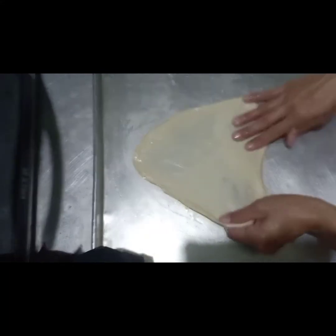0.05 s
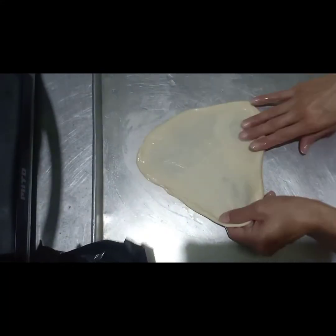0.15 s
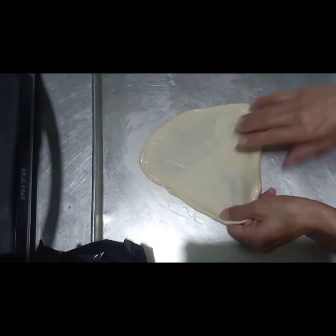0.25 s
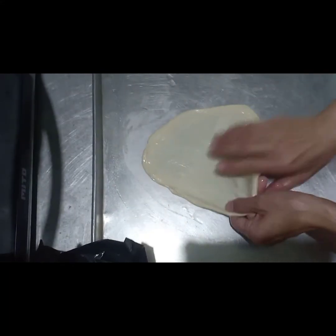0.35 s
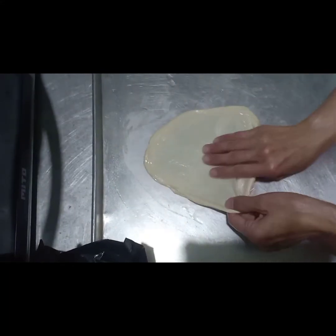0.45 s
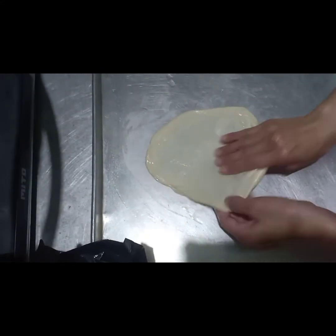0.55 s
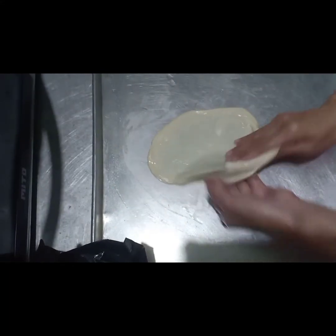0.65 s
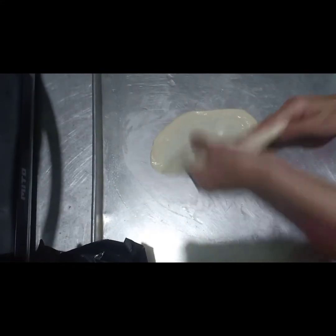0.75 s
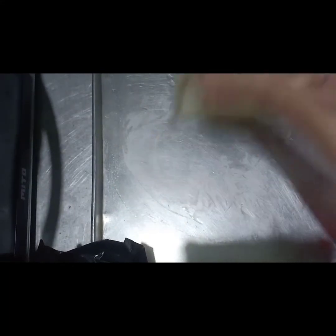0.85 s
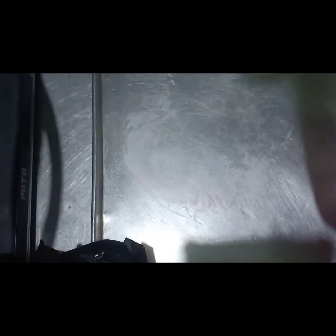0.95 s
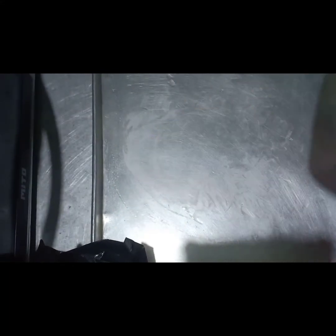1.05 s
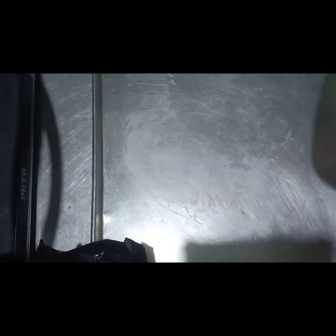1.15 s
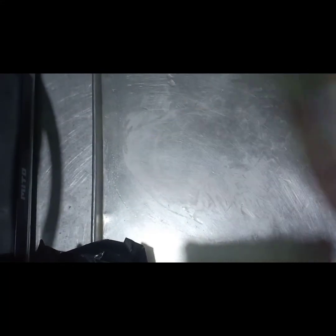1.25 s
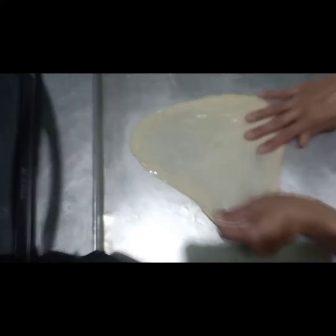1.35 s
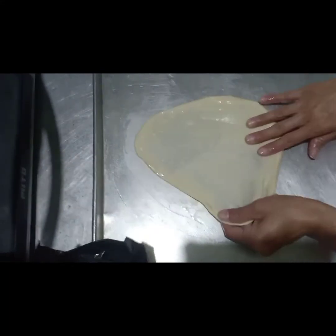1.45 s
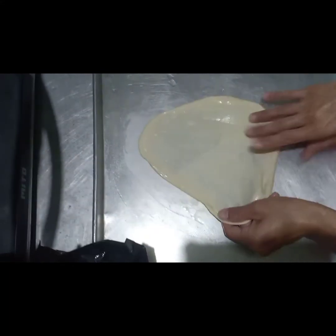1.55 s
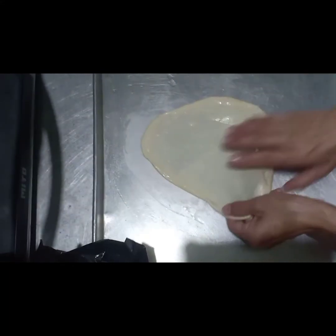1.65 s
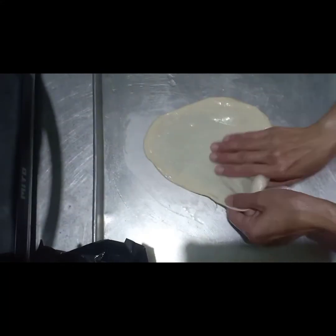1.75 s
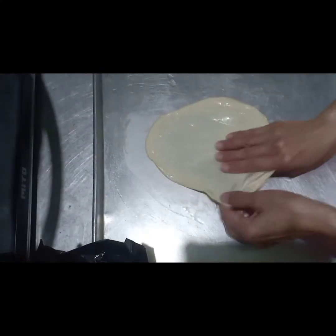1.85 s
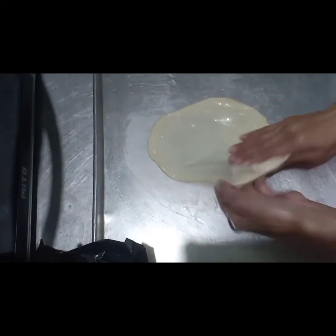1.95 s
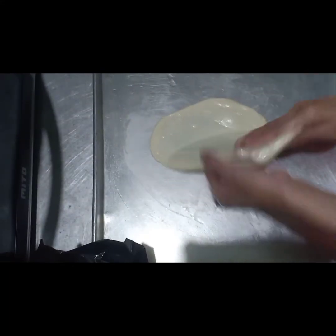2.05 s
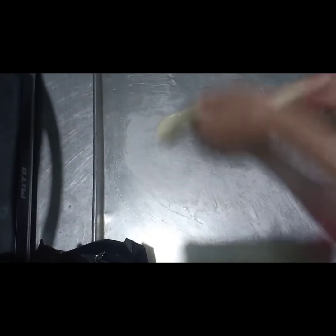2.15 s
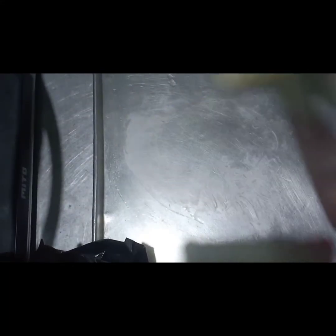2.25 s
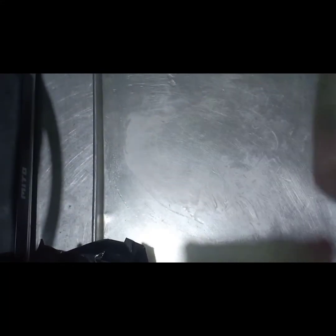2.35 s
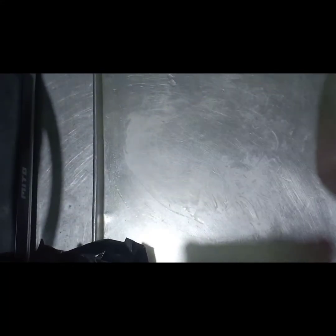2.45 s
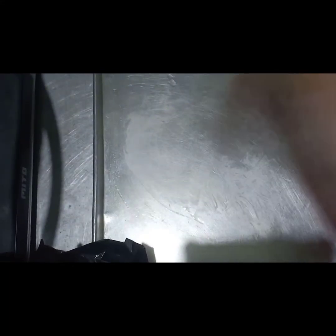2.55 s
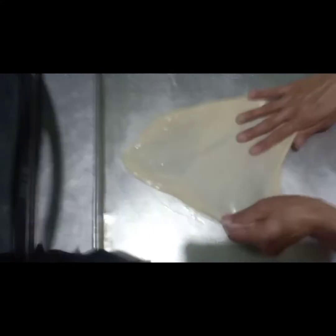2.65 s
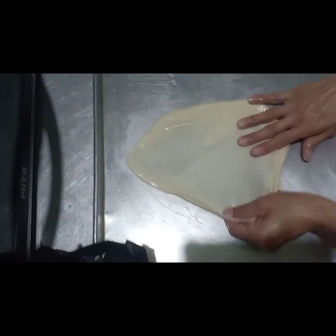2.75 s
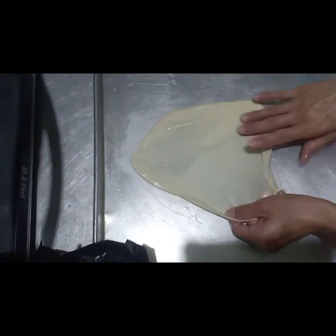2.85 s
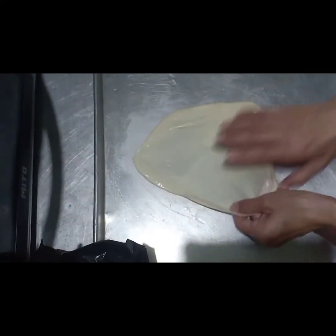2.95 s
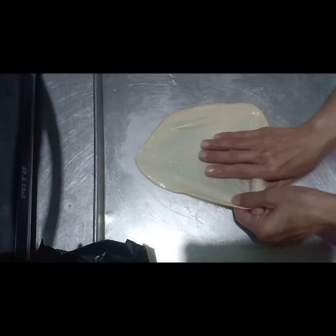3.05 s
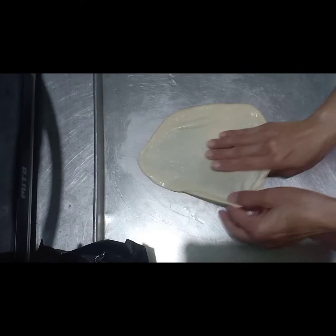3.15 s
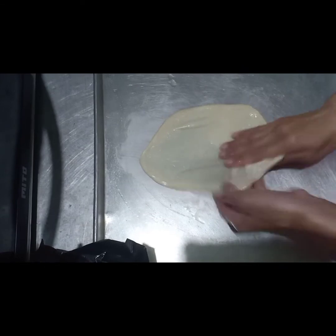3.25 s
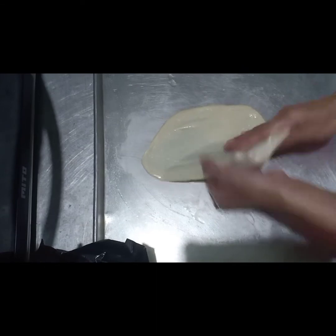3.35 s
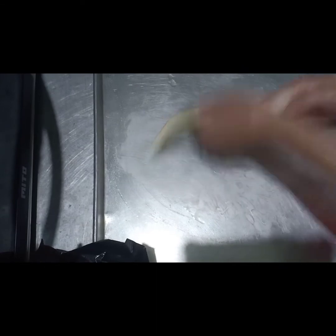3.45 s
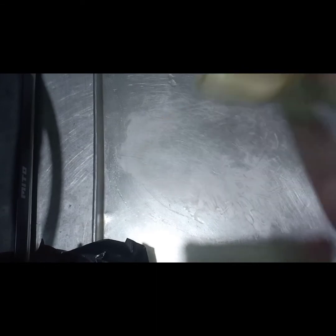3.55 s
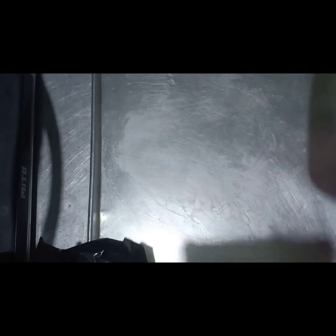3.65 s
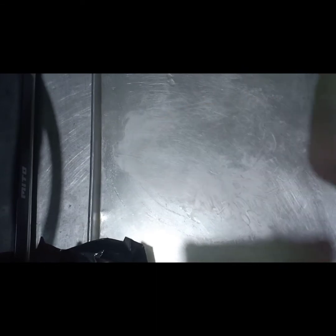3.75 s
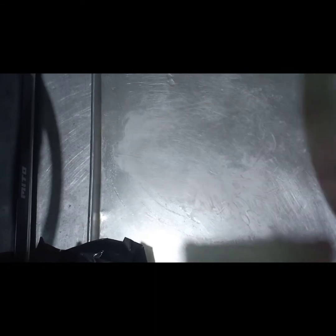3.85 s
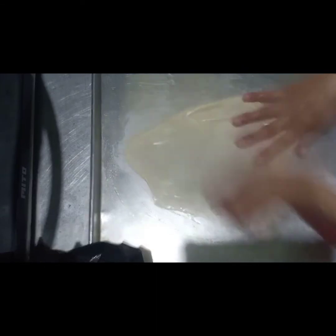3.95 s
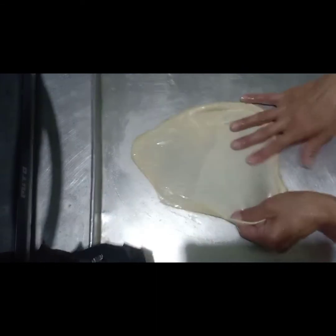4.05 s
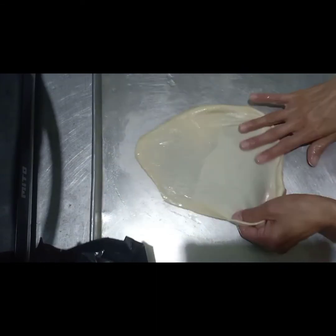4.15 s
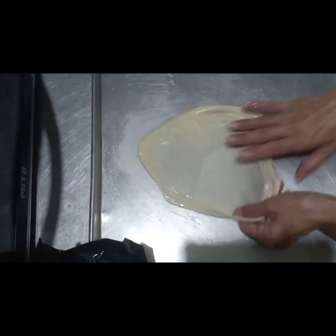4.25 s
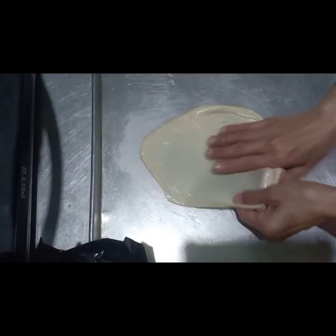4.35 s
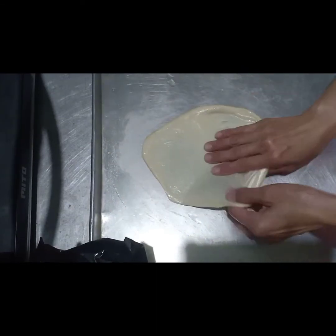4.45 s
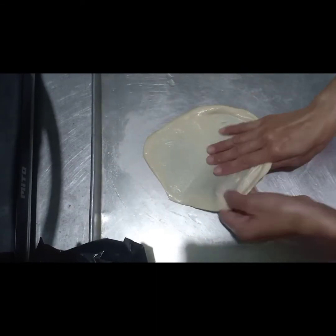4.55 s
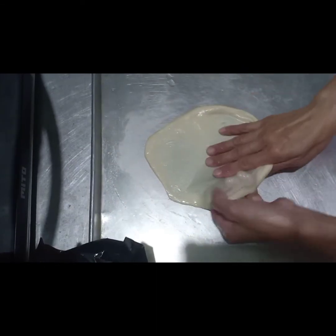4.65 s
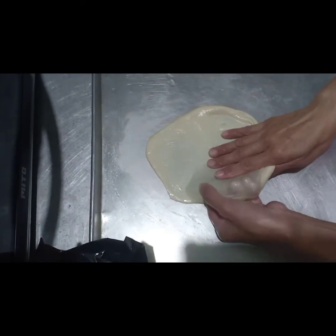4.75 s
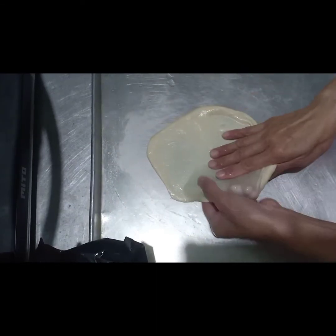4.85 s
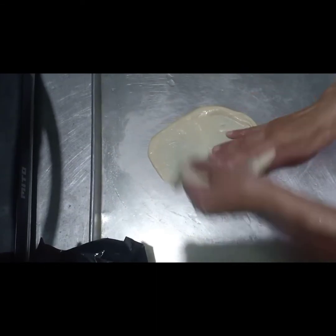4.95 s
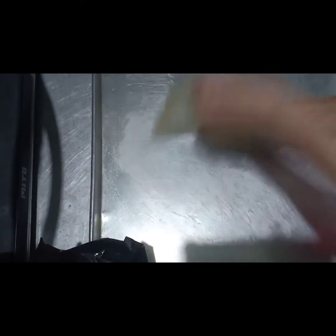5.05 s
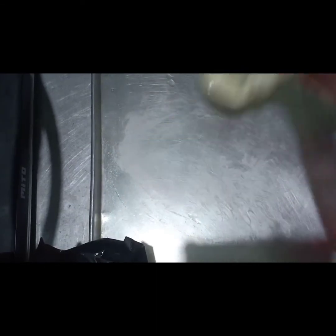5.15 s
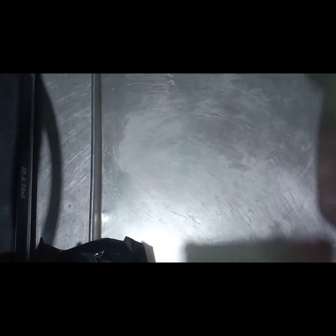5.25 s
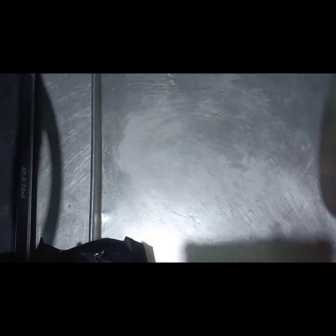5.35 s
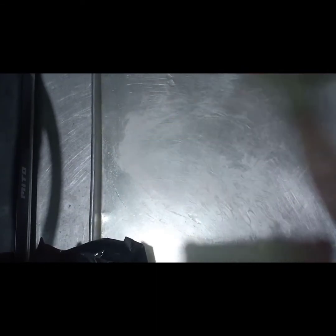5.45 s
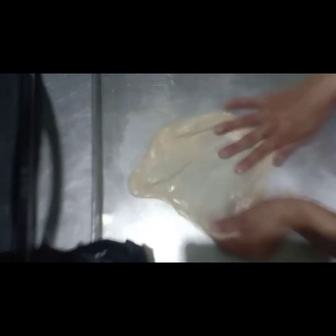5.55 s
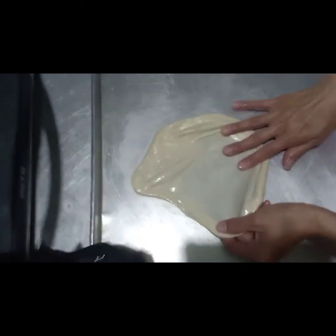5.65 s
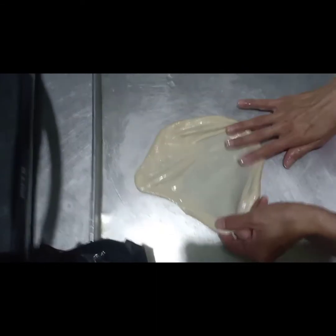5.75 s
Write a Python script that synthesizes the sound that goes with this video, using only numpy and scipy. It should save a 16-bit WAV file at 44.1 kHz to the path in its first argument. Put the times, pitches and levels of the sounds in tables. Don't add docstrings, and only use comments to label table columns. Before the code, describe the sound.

In a hard-walled kitchen with a low fan rumble and soft air hiss, a sheet of oiled dough is swung onto a steel table, heard close in stereo. The first slap lands at 0.12 seconds: several wet contacts within a few hundredths of a second, a sharp splashy crack with a thud, brief damped table ring and short echo. Faint finger pats with hollow pops follow at 0.5 to 0.65, then tiny distant clinks around 0.9 to 1.4. The second slap hits at 1.44, fuller; quiet pats come at 1.8 to 2.25. The third, at 2.75, is drier, with a soft flop as it settles until 2.9. Light pats follow at 3.2 to 3.5. A far cupboard door knocks at 3.8, and a utensil clinks at 3.94. The fourth slap strikes at 4.08, wet and splashy, with pats at 4.4 to 4.6 and a faint clink at 4.9. The last smack cracks at 5.7, its echo cut short by the ending.

```python
import sys
import numpy as np
from scipy import signal
from scipy.fft import rfft, irfft
from scipy.io import wavfile

SR = 44100
rng = np.random.default_rng(int(sys.argv[2]) if len(sys.argv) > 2 else 0)


def rack_gain(trim_db):
    fader = np.asarray(trim_db, float)
    return 10 ** (fader / 20)


def dump(signal):
    limited = np.clip(np.atleast_2d(signal).T, -1, 1)
    pcm = np.round(limited * 32767).astype(np.int16)
    wavfile.write(sys.argv[1], SR, pcm)


N = 255338


# mode in Hz, level in dB, T60 in seconds.
TABLE_MODES = [(123, -11, 0.54), (272, -19, 0.044), (553, -25, 0.086), (960, 2, 0.064)]


def dough():
    touch = rack_gain(-4.0) * contacts(landings(), lag_per_db=2.0)
    return touch + rack_gain(-41.5) * struck(TABLE_MODES, touch.mean(axis=0))


# start in seconds, peak in dB, thump in dB, splash in dB, left-right in dB.
EDGE_HITS = [
    (0.1201, -18, -6.5, -17, 0.5),
    (1.4388, -10, -2.5, -12, 1.5),
    (2.748, -15.5, -22, -29.5, 2.5),
    (4.083, -13, -6.5, -11, -3),
    (5.701, -7, -7.5, -18.5, -4.5),
]
# start in seconds, peak in dB, splash in dB, left-right in dB.
BELLY_HITS = [(0.133, -2.5, -9.5, 3), (0.139, 0, -11, 0), (0.16, -13, -6, 4.5), (0.179, -12, -5, -6.5),
              (0.237, -15, -15, 4), (1.4434, 0.5, -28.5, 2.5), (1.452, -0.5, -10, 0.5),
              (1.463, -13.5, -9, 3.5), (1.474, -10, -13.5, -8.5), (2.758, 2, -15.5, 2.5),
              (2.767, -7, -24, -6), (2.773, -10, -27, -2), (2.79, -5, -26, -4.5), (4.088, -3, -18, -5.5),
              (4.0955, -0.5, -10, 5), (4.101, -9.5, -25.5, 5.5), (4.112, -11, -22, -1),
              (5.7107, 3, -15, -3), (5.725, -7, -22, -4), (5.738, -16, -20, -6)]
# start in seconds, peak in dB.
SETTLING = [
    (0.19, -27),
    (0.27, -33.5),
    (2.80, -18.5),
    (2.835, -19),
    (2.9, -27.5),
]
SLAP_BODY_DB = [-0.5, 1, 2.5, 1.5, -2]


def landings():
    edge = [(s, peak_db, thump_db, splash_db, 5.07, pan_db)
            for s, peak_db, thump_db, splash_db, pan_db in EDGE_HITS]
    edge_s = [row[0] for row in EDGE_HITS]
    belly = []
    for s, peak_db, splash_db, pan_db in BELLY_HITS:
        slap = np.searchsorted(edge_s, s) - 1
        contact_ms = 3.49 - 0.06 * (peak_db + 6)
        belly.append((s, peak_db, -14 + SLAP_BODY_DB[slap], splash_db, contact_ms, pan_db))
    settling = [(s, peak_db, -11, -19.5, 32, 0) for s, peak_db in SETTLING]
    return edge + belly + settling


# frequency in Hz, density in dB per Hz.
SMACK = [(35, -40), (70, -12), (411, -7.5), (756, -4), (978, -3.5), (1420, -7.5), (2280, -0.5), (3500, -9),
         (4300, -10.5), (5250, -5.5), (7000, -16.5), (8700, -29.5), (15000, -40), (16400, -44)]


def contacts(rows, lag_per_db):
    length = 3000
    out = np.zeros((2, N + 3100))
    t_ms = 1000 * np.arange(length) / SR
    cuts = ((700, "low"), ((700, 3600), "band"), ((3600, 7500), "band"), (7500, "high"))
    split = [signal.butter(2, *cut, fs=SR, output="sos") for cut in cuts]
    for s, peak_db, thump_db, splash_db, ms, pan_db in rows:
        spikes = rng.exponential(1, length) ** 0.47
        shared, left, right = rng.standard_normal((3, length)) * spikes
        shared[0] = -rack_gain(9.5) * (ms < 10)
        burst = (shared + 0.67 * np.array([left, right])) * np.exp(-t_ms / max(ms, 0.3))
        parts = [signal.sosfilt(sos, burst) for sos in split]
        low, middle, high, air = (part / np.abs(part).max() for part in parts)
        touch = rack_gain(thump_db + 2) * low.mean(axis=0) + middle
        touch = touch + rack_gain(splash_db + 12) * high + rack_gain(splash_db * 1.16 + 23) * air
        touch = rack_gain(peak_db) * touch
        lag = int(np.clip(round(pan_db * lag_per_db), -20, 20))
        for side, sign in enumerate((1, -1)):
            at = round(s * SR) + max(-sign * lag, 0)
            out[side, at:at + length] += touch[side] * rack_gain(sign * pan_db / 2)
    return colour(out[:, :N], SMACK)


def pats():
    length = 4000
    pops = np.zeros(N + length)
    for s, peak_db, _, hollow_hz in PATS:
        puff = rng.standard_normal(length) * np.exp(-np.arange(length) / (SR * 0.006))
        pop = ring(puff, hollow_hz, 58.0 / hollow_hz)
        at = round(s * SR)
        pops[at:at + length] += rack_gain(peak_db) * pop / np.abs(pop).max()
    return rack_gain(-9.5) * contacts(fingers(), lag_per_db=0) + pops[:N] * np.array([[rack_gain(0.7)], [rack_gain(-0.7)]])


# start in seconds, peak in dB, thump in dB, hollow under the hand in Hz.
PATS = [(0.494, -45, -5, 943), (0.56, -48.5, -11, 960), (0.652, -39.5, -5.5, 960), (1.778, -48, 1.5, 2220),
        (1.889, -48.5, -14, 947), (1.988, -38, -7, 970), (2.243, -47.5, -24, 2270),
        (3.21, -51.5, -20, 2690), (3.299, -44, -7.5, 960), (3.480, -46.5, -23, 933),
        (3.522, -48.5, -26, 2320), (4.389, -48.5, -9, 730), (4.459, -49, -2, 763),
        (4.481, -39.5, -35, 2770), (4.57, -49, -14, 750), (4.618, -35.5, -10.5, 990)]


def fingers():
    return [(s, peak_db + 12, thump_db, -21, 2.36, 0) for s, peak_db, thump_db, _ in PATS]


# mode in Hz, level in dB, T60 in seconds.
CUPBOARD_MODES = [(150.5, -6, 0.28), (290, -6, 0.32), (471, -7.5, 0.17), (512, -6.5, 0.33),
                  (654, -11, 0.31), (807, -3.5, 0.098)]
# start in seconds, peak in dB.
CUPBOARD_HITS = [(3.811, -34.5), (3.826, -33.5), (3.85, -36.5), (3.89, -43)]
# mode in Hz, level in dB, T60 in seconds.
UTENSIL_MODES = [(2270, -4, .05), (2510, -4, 0.14), (3086, 3.5, 0.14), (4000, 2, 0.041),
                 (5160, -5.5, 0.098), (5800, -17, 0.054)]
# start in seconds, peak in dB.
UTENSIL_HITS = [(3.938, -43), (3.944, -49.5), (3.958, -51), (3.975, -51)]


def clatter():
    rings = struck(CUPBOARD_MODES, clicks(CUPBOARD_HITS)) + struck(UTENSIL_MODES, clicks(UTENSIL_HITS))
    flutter = np.array([drift(58), drift(58)])
    return rack_gain(-13.5) * contacts(far_work(), lag_per_db=1.0) + rings * (0.64 + 0.5 * flutter)


# start in seconds, peak in dB, splash in dB, left-right in dB.
CLINKS = [(0.003, -62, 16.5, -7), (0.029, -57, 13, -8), (0.868, -50.5, 1, -5), (1.113, -48.5, -10, 0),
          (1.15, -64, 13, -3), (1.18, -60, 8, -4), (1.30, -57.5, 5, -5), (1.328, -53.5, 12, 6),
          (1.365, -62, 10, -3), (2.08, -62, 2, 0), (2.30, -63, 0, 5), (2.53, -61, -1, -4),
          (3.940, -54.5, -3, -10), (3.975, -60.5, -3, -3), (4.903, -56.5, 4, 7)]
# start in seconds, peak in dB, thump in dB, contact in ms.
KNOCKS = [
    (3.792, -52.5, 2, 9.8),
    (3.811, -46.5, -3.5, 12),
    (3.825, -58.5, 15, 10),
    (3.85, -67.5, 16, 22),
]


def far_work():
    gain_db = 13
    clinks = [(s, peak_db + gain_db, -30.5, splash_db, 7.4, pan_db) for s, peak_db, splash_db, pan_db in CLINKS]
    knocks = [(s, peak_db + gain_db, thump_db, -14, ms, -2) for s, peak_db, thump_db, ms in KNOCKS]
    return clinks + knocks


# frequency in Hz, T60 in seconds.
KITCHEN_T60_S = [(60, 0.25), (250, 0.5), (800, 0.45), (2500, .44), (5500, 0.4), (15000, 0.38)]
# frequency in Hz, gain in dB.
WALLS_TOP = [(6000, 0.5), (9000, -3.5), (15000, 5)]


def kitchen(rows, wet_db, bands):
    s, peak_db, thump_db, splash_db, ms, _ = np.transpose(rows)
    step = 16
    rate = SR / step
    span = np.arange(500)
    at = (np.round(s * rate).astype(int)[:, None] + span).ravel()
    spent = np.exp(-2000 * span / rate / np.maximum(ms, 0.3)[:, None]) * 2000 / rate
    build = np.exp(-1 / (rate * 0.001))
    near_t60_s, near_db = 0.1, 7.5
    out = 0
    for hz, band in bands:
        bass = at_hz([(600, 1), (1600, 0)], hz)
        treble = at_hz([(2800, 0), (5000, 1), (10000, 0.8)], hz)
        weight_db = bass * (thump_db + 11.5) + treble * (splash_db + 9.5) + at_hz(WALLS_TOP, hz)
        poured = rack_gain(2 * (peak_db + weight_db + wet_db))[:, None] * spent
        energy = np.bincount(at, poured.ravel(), N // step + 1) + 1e-18
        energy = signal.lfilter([1 - build], [1, -build], energy)
        whole = signal.lfilter([1], [1, -rack_gain(-120 / (rate * at_hz(KITCHEN_T60_S, hz)))], energy)
        near = signal.lfilter([1], [1, -rack_gain(-120 / (rate * near_t60_s))], energy)
        level = np.sqrt(whole + rack_gain(2 * near_db) * near)
        patchy = rack_gain(1.57 * drift(25))
        out = out + band * patchy * np.interp(np.arange(N) / step, np.arange(len(level)), level)
    return colour(out, SMACK)


# frequency in Hz, density in dB per Hz.
FAN = [(15, -54.5), (25, -32), (48, -17), (58, -14.5), (80, -4.5), (253, -12.5), (444, -9.5), (565, -12),
       (682, -12), (782, -15), (897, -15), (994, -15), (1500, -15.5), (1950, -51), (3300, -120)]
# frequency in Hz, density in dB per Hz.
HISS = [(530, -49), (900, 0.5), (992, -11.5), (1070, -10), (1280, -6.5), (1550, -5.5), (1960, -3),
        (2180, 1.5), (3950, -7.5), (5420, -2), (6990, -15.5), (9810, -23.5), (15000, -22.5), (15700, -20),
        (16300, -44.5)]
# frequency in Hz, width in Hz, level in dB.
HUM = [(80.4, 9.3, -62.5), (124, 8.7, -65.5), (222.5, 5.53, -71)]
# time in seconds, level in dB.
DRAUGHT = [(0.0, -49), (0.6, -52.5), (1.3, -52.5), (2.7, -52.5), (3.15, -55.5), (5.79, -55.5)]


def background(bands):
    t = np.arange(N) / SR
    flow_db = np.interp(t, *np.transpose(DRAUGHT))
    linger_s = 0.24
    linger = sum((t > s) * np.exp(-np.maximum(t - s, 0) / linger_s) for s, *_ in EDGE_HITS)
    fan_change_db = 0.598 * (flow_db - flow_db.mean()) + 10.5 * linger
    hiss_db = flow_db + 10 * linger
    fan, hiss, together = 0, 0, drift(1.344)
    for hz, forward in bands:
        band = forward[:, ::-1]
        wander = rack_gain(together + 0.21 * drift(15.0))
        if hz < 1200:
            fan = fan + band * wander
        else:
            hiss = hiss + band * wander
    tones = 0
    for hz, width_hz, level_db in HUM:
        tones = tones + rack_gain(level_db) * rms_one(ring(rng.standard_normal(N), hz, 3.2 / width_hz))
    rumble = rack_gain(fan_change_db - 57.5) * rms_one(colour(fan, FAN))
    return rumble + rack_gain(hiss_db) * rms_one(colour(hiss, HISS)) + tones * rack_gain(fan_change_db - 2.0)


# frequency in Hz, correlation from -1 to 1.
LIKENESS = [(60, 0.96), (150, 0.91), (380, 0.69), (950, 0.09), (2380, 0.01), (5980, -0.01), (15000, -0.01)]


def diffuse(count):
    edges_hz = 25 * 2 ** np.arange(0, 9.5, 1 / 3)
    white = rng.standard_normal((2, 2, count))
    for k, (low, high) in enumerate(zip(edges_hz, edges_hz[1:])):
        sos = signal.butter(2, [low, high], "band", fs=SR, output="sos")
        mid, side = signal.sosfilt(sos, white[k % 2])
        hz = np.sqrt(low * high)
        alike = np.clip(at_hz(LIKENESS, hz), -1, 1)
        yield hz, np.sqrt(1 + alike) * mid + np.sqrt(1 - alike) * side * [[1], [-1]]


def struck(modes, force):
    return sum(rack_gain(level_db) * ring(force, hz, t60_s) for hz, level_db, t60_s in modes)


def ring(x, hz, t60_s):
    r, w = rack_gain(-60 / (t60_s * SR)), 2 * np.pi * hz / SR
    return signal.lfilter([0, np.sin(w)], [1, -2 * r * np.cos(w), r * r], x + 1e-18)


def clicks(hits):
    return sum(rack_gain(peak_db) * (np.arange(N) == round(s * SR)) for s, peak_db in hits)


def drift(rate_hz):
    knots = rng.standard_normal(int(rate_hz * N / SR) + 2)
    return 1.22 * np.interp(np.arange(N) * rate_hz / SR, np.arange(len(knots)), knots)


def colour(x, spectrum):
    hz = np.maximum(np.fft.rfftfreq(8192, 1 / SR), 1)
    cepstrum = irfft(np.log(rack_gain(at_hz(spectrum, hz))))
    cepstrum[1:4096] *= 2
    response = irfft(np.exp(rfft(cepstrum[:4097], 8192)))
    return signal.oaconvolve(x, response[None] / np.linalg.norm(response), axes=1)[:, :N]


def at_hz(points, hz):
    table_hz, value = np.transpose(points)
    return np.interp(np.log(hz), np.log(table_hz), value)


def rms_one(x):
    return x / np.sqrt(np.mean(x ** 2) + 1e-20)


def scene():
    sheet, hand, far = landings(), fingers(), far_work()
    wet_db = np.repeat([-31, -30, -27], [len(sheet), len(hand), len(far)])
    bands = list(diffuse(N))
    echoes = kitchen(sheet + hand + far, wet_db, bands)
    return dough() + pats() + clatter() + echoes + background(bands)


def roll_off(x):
    return signal.sosfilt(signal.butter(12, 16480, fs=SR, output="sos"), x)


def record(dry):
    cut = signal.sosfilt(signal.butter(3, 62, "high", fs=SR, output="sos"), dry)
    rounded = 1.12 * np.tanh(cut / 1.299) + 0.00074
    mix = signal.sosfilt(signal.cheby2(12, 60, 16700, fs=SR, output="sos"), rounded)
    return roll_off(mix)


dry = scene()
out = record(dry)
dump(out)
```